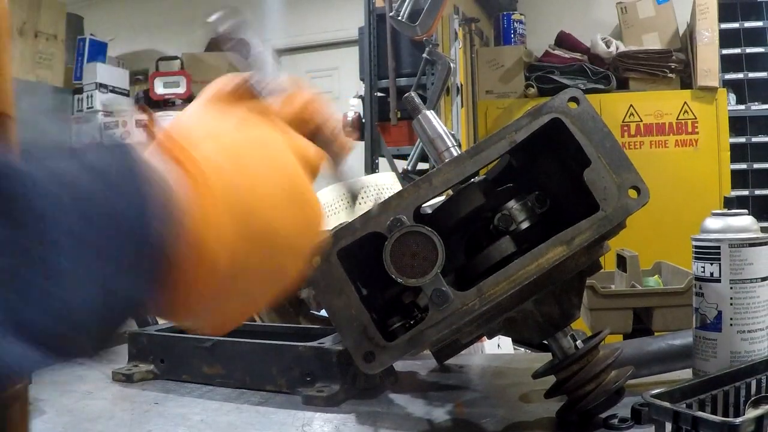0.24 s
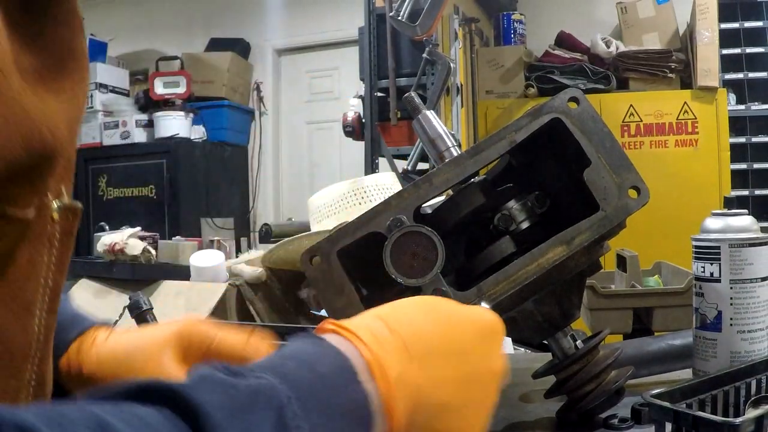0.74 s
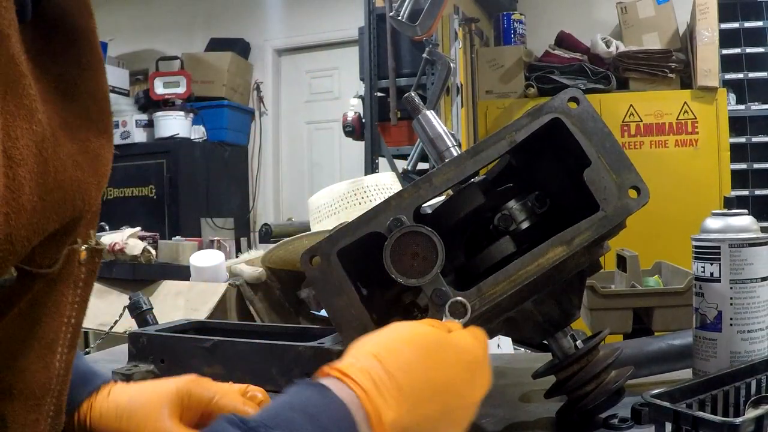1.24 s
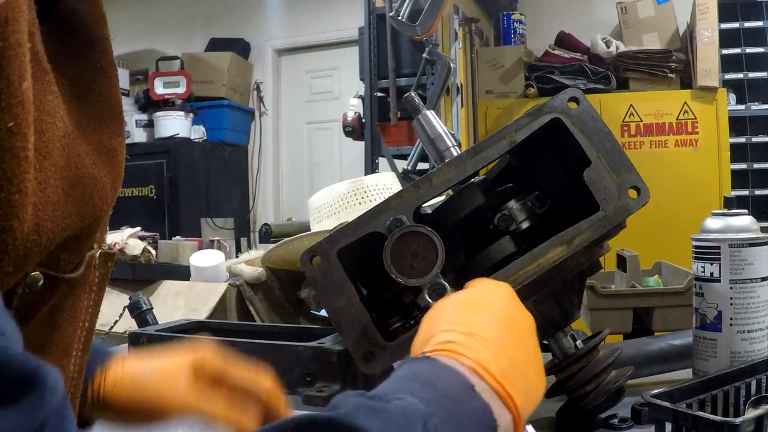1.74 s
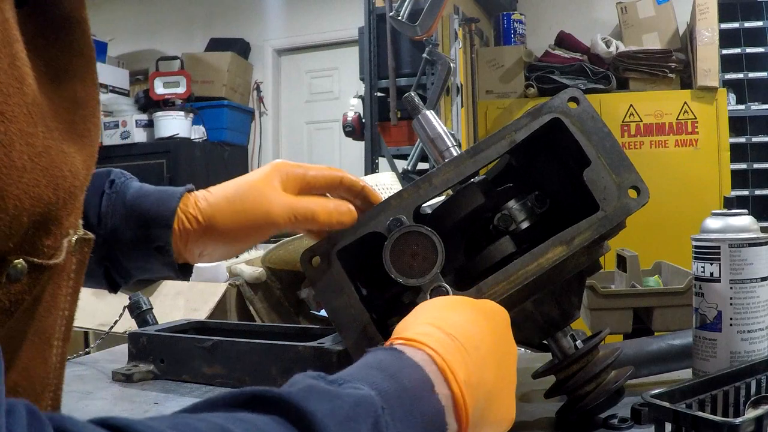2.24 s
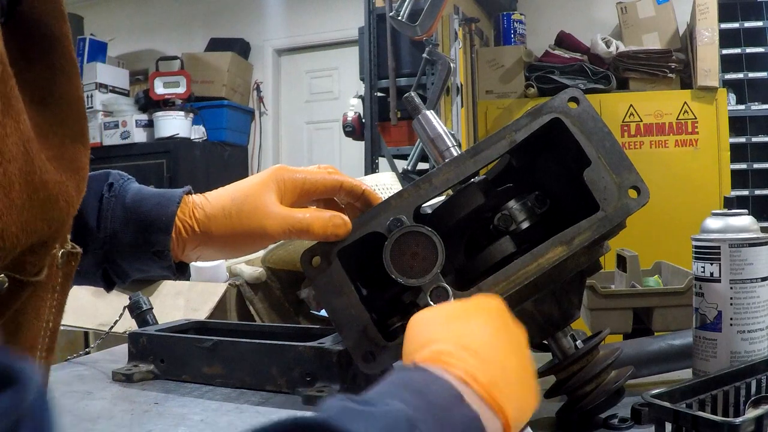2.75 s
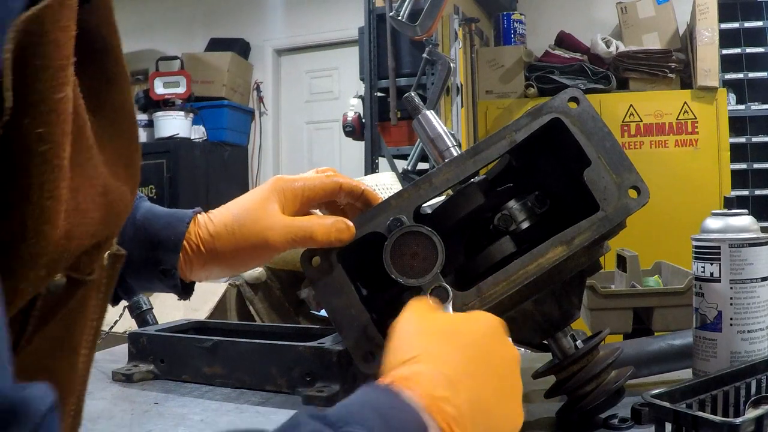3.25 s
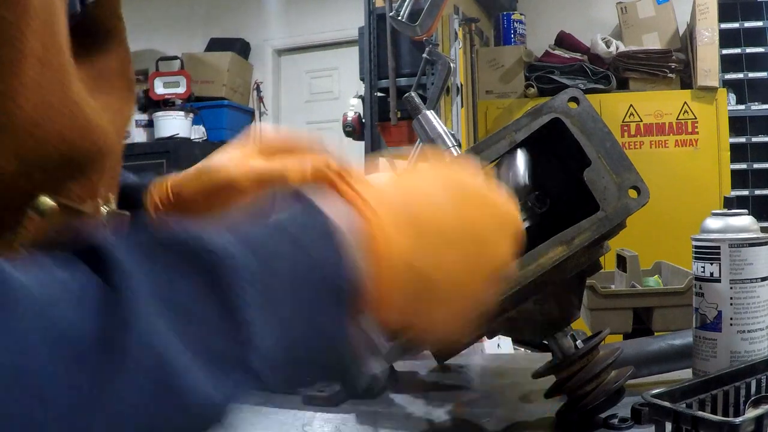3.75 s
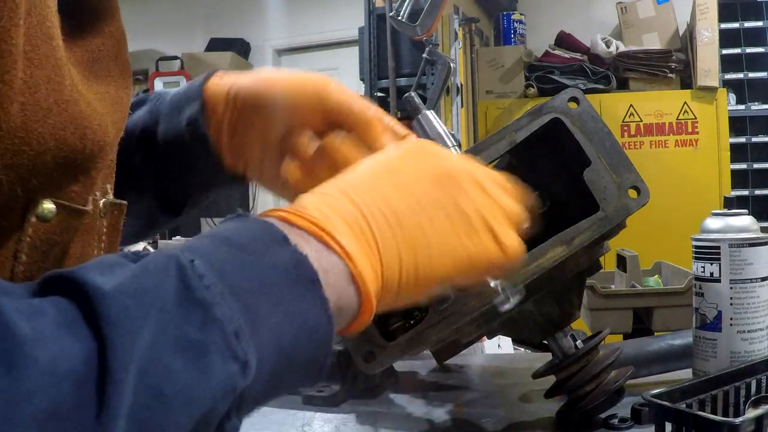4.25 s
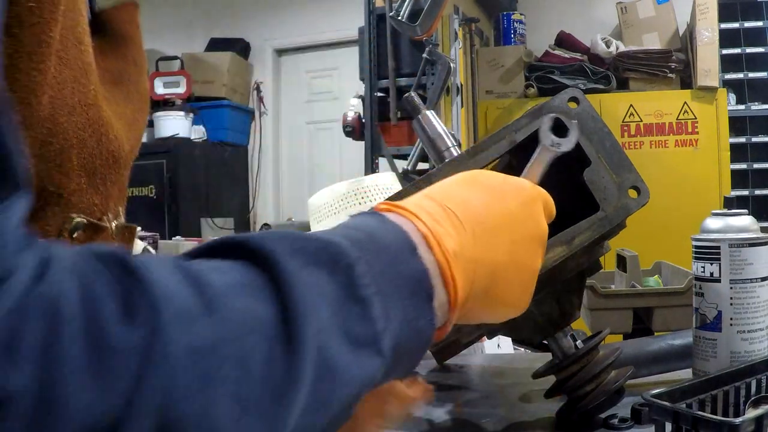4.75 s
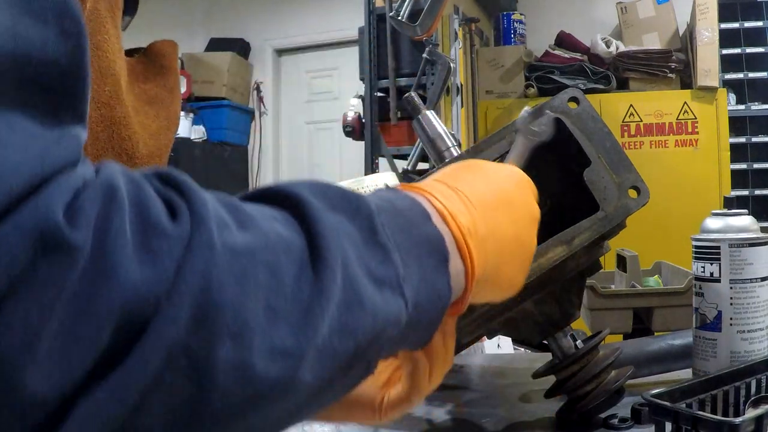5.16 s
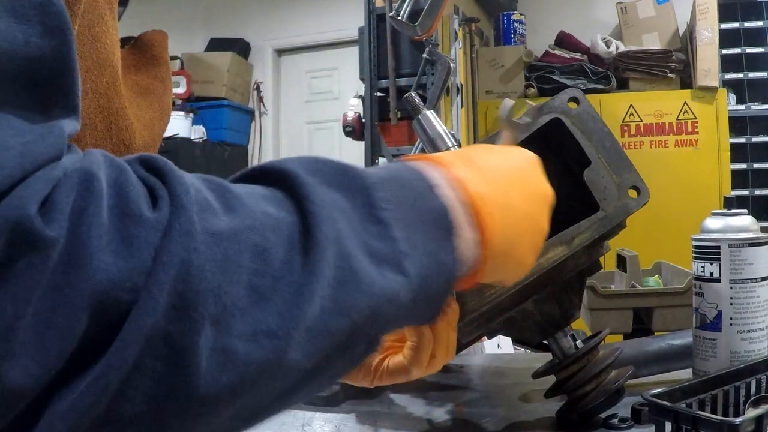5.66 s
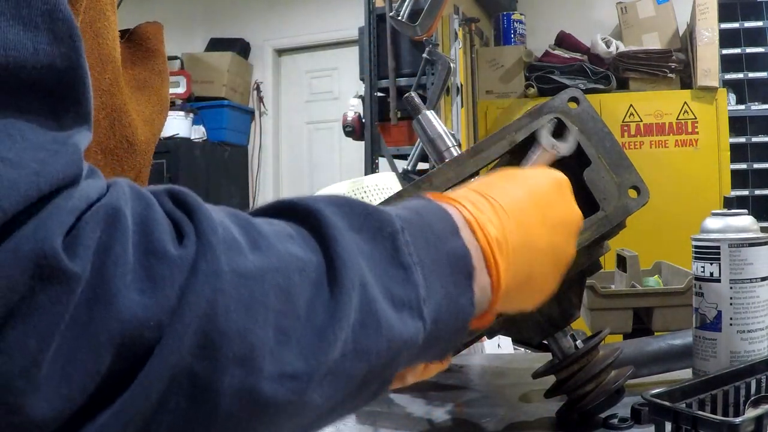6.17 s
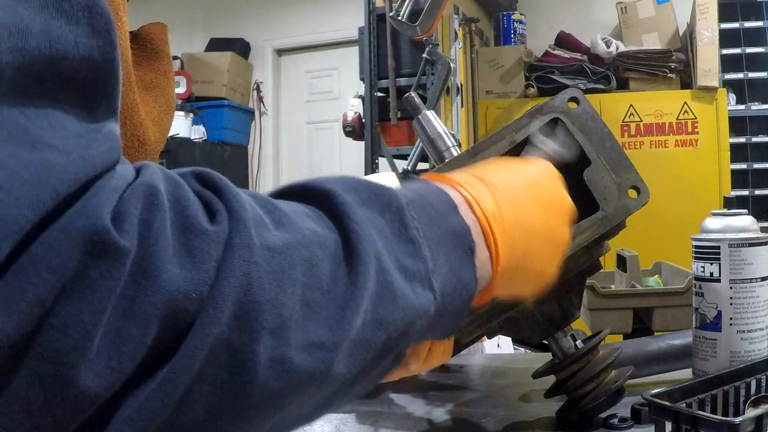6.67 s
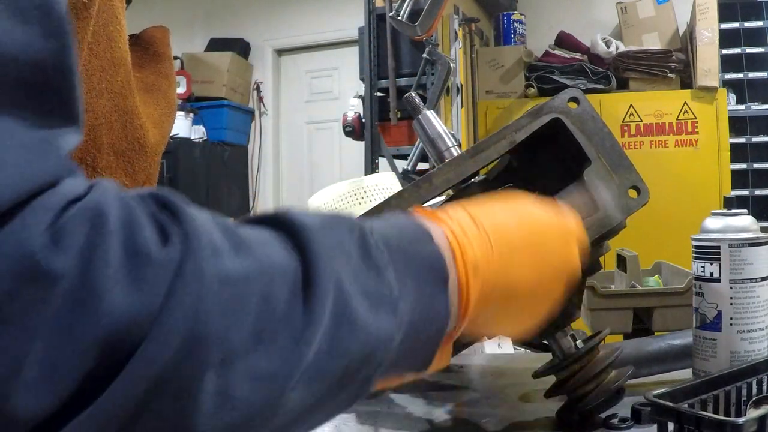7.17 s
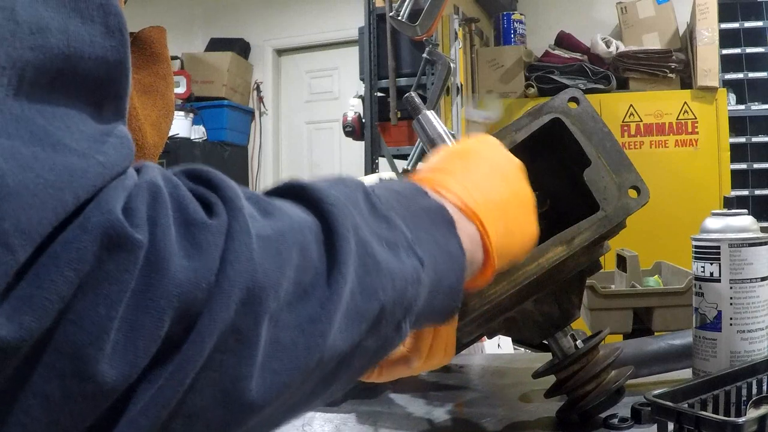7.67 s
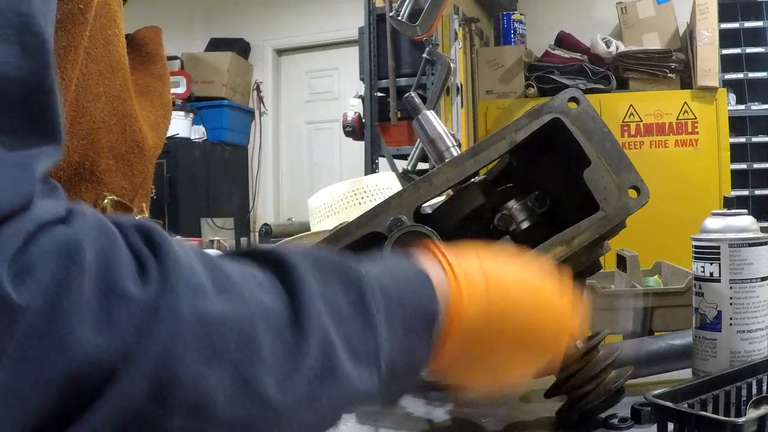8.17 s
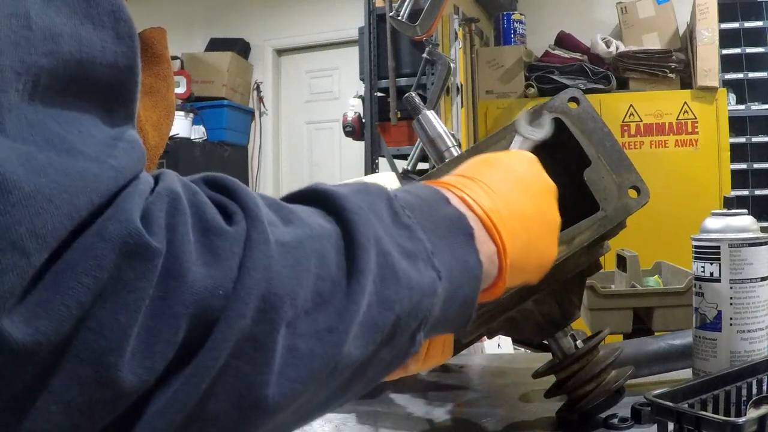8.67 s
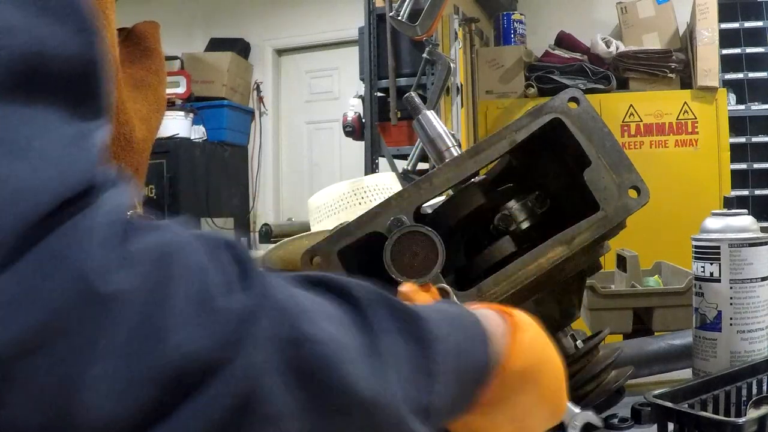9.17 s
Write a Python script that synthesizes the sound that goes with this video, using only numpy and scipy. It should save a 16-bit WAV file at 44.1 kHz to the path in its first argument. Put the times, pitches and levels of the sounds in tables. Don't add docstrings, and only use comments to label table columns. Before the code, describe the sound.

Faint ticks and stiff sleeve rubbing lead into hard metallic blows on a hollow iron casing, each ringing for about half a second over a faint bench drone. The biggest clank comes last. Then the work becomes gentler: hand-damped knocks, wrench jaw clinks, brief chatter and dragging, in uneven clusters to the end. The workshop sounds hard and moderately live, with low air rumble, heard close through a small microphone.

```python
import sys
import numpy as np
from scipy import signal
from scipy.fft import rfft, irfft
from scipy.io import wavfile
from scipy.ndimage import uniform_filter1d

SR = 44100
rng = np.random.default_rng(int(sys.argv[2]) if len(sys.argv) > 2 else 0)


def volts(x):
    e = np.asarray(x, float) / 20
    return 10 ** e


def generate_wav(signal):
    frames = np.transpose(np.atleast_2d(signal))
    scaled = np.clip(frames, -1, 1) * 32767
    pcm = np.round(scaled).astype(np.int16)
    wavfile.write(sys.argv[1], SR, pcm)


N = 415422

# frequency in Hz, level in dB per Hz.
THUD = [(110, -59.5), (180, -14), (518, -8), (710, -7.5), (932, -6.5), (1010, -4), (1100, -2), (1290, -5.5),
        (1570, -7), (1710, -15), (2200, -20), (2860, -48), (4840, -120)]
# frequency in Hz, level in dB per Hz.
THUD_HELD = [(110, -47), (180, -6), (254, -3.5), (429, -7.5), (633, -8.5), (772, -2), (972, -8),
             (1190, -2.5), (1430, -12.5), (1770, -20), (2200, -44), (2860, -78), (4840, -120)]
# frequency in Hz, level in dB, t60 in seconds.
CASING_HELD = [(265.6, -4, 0.3), (436, -1.5, 0.64), (517.3, -5.5, 0.57), (545, 2, 0.14), (703, 0.5, 0.34),
               (782, 4, 0.14), (949, 0.5, 0.34), (1064, -9, 0.594), (1140, 6.5, 0.18), (1348, -4, 0.12),
               (1500, -11, 0.39), (2230, -19.5, 0.12), (2560, -28.5, 0.12)]
# frequency in Hz, level in dB, t60 in seconds.
WRENCH_MODES = [
    [(2790, -20, .03), (3120, -1, .045), (3250, 0, .045), (3490, -9, .035)],
    [(4950, 0, .05), (5150, -10, .03), (5700, -12, .03), (4540, -14, .03)],
    [(8260, 0, .045), (6420, -6, .035), (6850, -6, .03), (10300, -10, .025), (11900, -20, .03)],
]


def evened(x):
    return x / np.sqrt(np.mean(x ** 2) + 1e-20)


def peaked(x):
    return x / np.sqrt(np.mean(x[:500] ** 2))


def read(points, hz):
    f, value = np.transpose(points)
    return np.interp(np.log(hz + 1), np.log(f + 1), value)


def add(mix, s, sound):
    part = mix[round(s * SR):][:len(sound)]
    part += sound[:len(part)]


def level(moves):
    s, db, swell, fade = np.transpose(moves)[:, :, None]
    t = np.arange(0, N + 200, 200) / SR
    span = np.where(t < s, swell, fade)
    arch = volts(db - 20 * ((t - s) / span) ** 2)
    return np.interp(np.arange(N) / SR, t, np.sqrt((arch ** 2).sum(0)))


def coloured(x, spectrum):
    gain = volts(read(spectrum, np.fft.rfftfreq(len(x), 1 / SR)))
    return evened(irfft(rfft(x) * gain, len(x)))


def noise(spectrum, patchy_db, flicker_db, size=N):
    hz = np.fft.rfftfreq(512, 1 / SR)
    a, b, patches = rng.standard_normal((size // 128 + 5, 257, 3)).T
    flicker = evened(uniform_filter1d(patches, size=120, axis=0))
    patches = uniform_filter1d(patches, size=5, axis=0)
    patches = evened(uniform_filter1d(patches, size=16, axis=1))
    gain_db = read(spectrum, hz)[:, None] + patchy_db * patches + flicker_db * flicker
    z = (a + 1j * b) * volts(gain_db)
    return evened(signal.istft(z, nperseg=512, noverlap=384)[1][:size])


def dying(x, slower=1.):
    # frequency in Hz, t60 in seconds.
    shop_decay = [(150, 0.72), (500, 0.56), (1200, 0.44), (2500, 0.5), (5000, 0.42), (8000, 0.42),
                  (12000, 0.2)]
    hz, t, z = signal.stft(x, SR, nperseg=256)
    t60 = slower * read(shop_decay, hz)[:, None]
    return signal.istft(z * volts(-60 * t / t60), SR, nperseg=256)[1][:len(x)]


def in_shop(dry, t, wet_db):
    shop = dying(rng.standard_normal(len(t))) * (1 - np.exp(-t / 0.0011))
    wet = volts(wet_db) * signal.fftconvolve(dry, shop / np.linalg.norm(shop))[:len(t)]
    fade_out = np.cos(np.pi / 2 * t / t[-1]) ** .5
    return (dry + wet) * fade_out


def ring(modes, t, centre_hz=1000, favour_db=0., damp=1., longest=.5, held=0., beat=.7, scatter_db=.3):
    hz, db, t60 = np.transpose(modes)[:, :, None]
    scatter, detune, phase, split = rng.standard_normal((4, len(modes), 1))
    db = db + favour_db * np.exp(-(np.log(hz / centre_hz) / 0.14) ** 2) + scatter_db * scatter
    db = db - 60 * np.maximum(t - held, 0) / np.minimum(t60 * damp, longest)
    pair = 1 + beat * np.cos(2 * np.pi * 0.0092 * hz * split * t)
    sines = np.sin(2 * np.pi * (hz * t * (1 + 0.0023 * detune) + phase))
    return peaked((volts(db) * pair * sines).sum(0))


def strike(row, contact_ms, casing, thud, length, damp, clear_db, crack_share, wet_db):
    # frequency in Hz, level in dB per Hz.
    plate_crack = [(1000, -35), (1700, -4.5), (1900, -16), (2050, -9.5), (2240, -4.5), (2650, -3.5),
                   (3250, 0), (3940, -6.5), (4250, -8.5), (5920, -5.5), (9670, -25.5), (14400, -38),
                   (15500, -45.5)]
    s, casing_db, crack_db, centre_hz, slower = row
    t = np.arange(round(SR * length)) / SR
    walls, plates, lumps = rng.standard_normal((3, len(t)))

    lumps = evened(uniform_filter1d(lumps[:len(t) // 2 + 1], size=round(90 * length) + 1))
    plates = irfft(rfft(plates) * volts(2.0 * lumps), len(t))
    crack = peaked(dying(coloured(plates, plate_crack), crack_share * slower))

    clear = ring(casing, t, centre_hz, favour_db=10.0, damp=damp * slower, longest=1.5, beat=0.67)
    near_spot = [(hz, db - 4.44 * abs(np.log2(hz / centre_hz))) for hz, db in thud]
    body = volts(clear_db) * clear + peaked(dying(coloured(walls, near_spot), slower))

    bloom = 1 - 0.5 * np.exp(-t / 0.03)
    crack_onset = 1 - 0.11 * np.exp(-t / 0.00067)
    dry = volts(casing_db) * body * bloom + volts(crack_db) * crack * crack_onset
    lag = round(contact_ms * SR / 1000)
    swell = dry[lag:0:-1] * np.linspace(0, 1, lag) ** 2
    return s + .002 - lag / SR, in_shop(np.append(swell, dry)[:len(t)], t, wet_db)


SHARP_MS, BUMP_MS = 0.46, 29


def blows():
    # start in seconds, casing level in dB, crack level in dB,
    # favoured casing region in Hz, ring length factor.
    wall_blows = [
        (2.105, -39, -51, 1040, 0.64),
        (3.784, -16, -24, 1130, 0.87),
        (7.373, -40, -45, 433, 0.45),
    ]
    rim_blows = [
        (2.38, -22.5, -28, 1124, 0.63),
        (2.696, -41, -50.5, 520, 0.79),
    ]
    flank_blows = [
        (1.482, -24, -25.5, 1000, 1.1),
        (1.768, -38.5, -49, 1010, 0.74),
    ]
    foot_blows = [
        (3.022, -22.5, -29.5, 1020, 0.76),
        (3.207, -28, -31.5, 685, 0.74),
    ]
    rebound = (2.5, -33.5, -49.5, 985, 0.79)
    # frequency in Hz, level in dB, t60 in seconds.
    wall_modes = [(285.5, 2, 0.25), (447, -6, 0.63), (520, -3.5, 0.45), (619.6, -3, 0.8), (697, 5, 0.3),
                  (759, -5, 0.36), (856, -2, 0.34), (934, 0.5, 0.78), (1081, 1, 0.48), (1132, -0.5, 0.44),
                  (1375, 3.5, 0.52), (1538, 3, 0.56), (1800, -30.5, 0.43), (1880, -11.5, 0.55),
                  (2294, -2.5, 0.45), (2497, -24, 0.73), (2744, -16, 0.62), (2900, -28, .6),
                  (3190, -21.5, 0.36), (3440, -10, 0.21), (3634, -4, 0.071)]
    rim_modes = [(260, -1.5, 0.15), (447, -14, 0.94), (527, -10, 0.5), (770, -4, 0.28), (980, -8, 0.55),
                 (1080, -8.5, 0.55), (1202, -9.5, 0.58), (1350, -8, 0.2), (1490, -6.5, 0.28),
                 (2137, -17, .2), (2425, -7, 0.13), (2804, -21, .25), (3300, -14.5, .25), (3620, -22, .2)]
    lip_modes = [(447, -6, 1), (536, -7, 0.41), (619, -11, .5), (955, 1, 0.38), (1082, -2, 0.41),
                 (1210, -5, .33), (1600, -7, .39), (1653, -6.5, .35), (2137, -20, .4), (2400, -7, 0.28),
                 (2466, -12, .36), (3095, -3, 0.19), (3420, -9, .2), (4097, -22, .3)]
    flank_modes = [(284.7, -9, 0.43), (447, -6, 0.66), (533, -8, 0.74), (626, -7.5, 0.58), (718, -7, 0.42),
                   (1012, -11, 0.53), (1170, -3.5, 0.36), (1386, -4.5, 0.46), (1540, -24, 0.18),
                   (2333, 2.5, 0.14), (2450, -8.5, .25), (2590, -19, .22), (3225, -5, 0.09),
                   (3660, -1, 0.1)]
    foot_modes = [(282, -3.5, 0.22), (447, -6.5, 0.71), (515, -6, 0.45), (770, -9.5, 0.34),
                  (921, -7.5, 0.61), (1080, -6, 0.3), (1234, -3, 0.3), (1530, -5, 0.23), (1670, -7, 0.3),
                  (2310, -6.5, 0.25), (2520, -21, 0.35), (2710, -24, 0.22), (2830, -9, 0.28),
                  (3300, -11.5, 0.29)]
    reseat_modes = [(290, -17, .25), (447, -16, 0.36), (513, -10, 0.53), (650, -16, .25), (775, -15, 0.32),
                    (860, -11, 0.43), (919, -5, .19), (980, -7, 0.23), (1100, -9, .25), (1130, -12, 0.33),
                    (1310, -22, .35), (1554, -17, .26), (2410, -16, 0.14), (3270, -24, .15)]
    out = np.zeros(N)
    for row, casing in zip(rim_blows, (rim_modes, lip_modes)):
        add(out, *strike(row, SHARP_MS, casing, THUD, 0.54, damp=1.0, clear_db=4.5,
                         crack_share=0.87, wet_db=-8.5))
    add(out, *strike(rebound, BUMP_MS, reseat_modes, THUD, 0.26, damp=1.44, clear_db=8.5,
                     crack_share=0.6, wet_db=-9.0))
    for row in flank_blows:
        add(out, *strike(row, 3.2, flank_modes, THUD, 0.6, damp=0.92, clear_db=5.0,
                         crack_share=0.56, wet_db=-8.5))
    for row in foot_blows:
        add(out, *strike(row, SHARP_MS, foot_modes, THUD, 0.6, damp=0.91, clear_db=3.0,
                         crack_share=0.69, wet_db=-9.5))
    for row in wall_blows:
        add(out, *strike(row, SHARP_MS, wall_modes, THUD, 0.59, damp=0.71, clear_db=6.0,
                         crack_share=0.87, wet_db=-13.5))
    return out


def taps():
    # start in seconds, casing level in dB, crack level in dB, favoured region in Hz,
    # ring length factor.
    tap_rows = [(1.408, -33, -37.5, 1130, 0.41), (2.011, -49, -44, 447, 0.69),
                (2.055, -39.5, -41, 1150, 0.32), (2.415, -32, -56, 1230, 0.15),
                (3.748, -33.5, -55, 1130, 0.2), (5.161, -43.5, -54, 780, 0.39),
                (5.287, -45, -60, 1160, 0.19), (5.438, -44.5, -63, 805, 0.22),
                (6.164, -53.5, -73, 439, 0.11), (6.472, -52.5, -61, 440, 0.42),
                (6.656, -50.5, -64, 921, 0.8), (6.769, -40.5, -48.5, 760, 0.24),
                (7.478, -40, -41, 1330, 0.35), (7.496, -39, -55, 750, 0.076),
                (7.819, -35.5, -44.5, 770, 0.4), (8.163, -51.5, -61.5, 754, 0.7),
                (8.299, -40.5, -51.5, 830, 0.39)]
    out = np.zeros(N)
    for row in tap_rows:
        add(out, *strike(row, SHARP_MS, CASING_HELD, THUD_HELD, 0.28, damp=2.16, clear_db=1.5,
                         crack_share=0.39, wet_db=-9.0))
    return out


def bumps():
    # start in seconds, casing level in dB, crack level in dB, favoured region in Hz.
    free_bumps = [(.353, -41.5, -59, 1027), (2.287, -45, -56.5, 1130), (3.47, -49, -59.5, 500),
                  (3.599, -51.5, -57.5, 980), (3.723, -40.5, -54, 1050), (5.252, -48, -50.5, 784),
                  (5.568, -53, -59.5, 770), (7.855, -42, -69, 520), (7.937, -42, -57, 782),
                  (8.536, -48.5, -59.5, 1250), (8.84, -49.5, -61.5, 890), (8.862, -54.5, -72, 1150),
                  (8.957, -48, -65.5, 940)]
    pressed_bumps = [(.858, -52.5, -58, 365), (2.097, -31, -58, 605), (2.257, -40.5, -60, 445),
                     (6.031, -45.5, -59, 790), (6.346, -50, -70, 760), (6.422, -44, -64, 1230),
                     (6.531, -53, -66, 703), (6.736, -40, -60, 845), (6.784, -42, -68, 795),
                     (6.93, -52, -85, 770), (7.121, -53.5, -83, 770), (7.233, -33.5, -56.5, 785),
                     (7.402, -36.5, -58, 650), (8.108, -66, -65, 759), (8.243, -45, -64, 810),
                     (8.521, -62, -61, 1170), (9.093, -31, -48.5, 775), (9.34, -51.5, -63, 413),
                     (9.409, -56, -61, 970)]
    out = np.zeros(N)
    for rows, ring_factor, contact_ms in (free_bumps, 0.49, BUMP_MS), (pressed_bumps, 0.18, 44):
        for row in rows:
            add(out, *strike((*row, ring_factor), contact_ms, CASING_HELD, THUD_HELD, 0.46, damp=1.97,
                             clear_db=-0.5, crack_share=0.88, wet_db=-7.5))
    return out


def ticks():
    # start in seconds, casing level in dB, crack level in dB, favoured region in Hz.
    tick_rows = [(.212, -46, -61, 420), (0.228, -51, -59, 423), (.579, -65, -62, 654),
                 (0.639, -61, -58, 775), (0.768, -47.5, -65, 552), (4.042, -53, -52.5, 1080),
                 (4.571, -50, -61.5, 470), (4.629, -64, -59.5, 1026), (4.75, -71, -62.5, 1130),
                 (7.353, -35, -44.5, 1290), (7.356, -34, -57, 560), (7.368, -28.5, -43, 510)]
    ring_factor = 0.043
    out = np.zeros(N)
    for row in tick_rows:
        add(out, *strike((*row, ring_factor), SHARP_MS, CASING_HELD, THUD_HELD, 0.53, damp=0.3,
                         clear_db=-19.0, crack_share=0.8, wet_db=-5.5))
    return out


def clink(row, groups):
    grip_factors = [0.99, 0.92, 0.58]
    s, *group_db = row
    t = np.arange(SR // 6) / SR
    steel = sum(volts(db) * ring(modes, t, held=0.0039, damp=grip, beat=0.44, scatter_db=2.5)
                for db, modes, grip in zip(group_db, groups, grip_factors))
    rough = 1 + 0.42 * evened(uniform_filter1d(rng.standard_normal(len(t)), size=90))
    onset = 1 - np.exp(-t / .001)
    return s, in_shop(volts(-3.) * steel * onset * rough, t, wet_db=-18.)


def clinks():
    # start in seconds, level in dB of the low, middle and high mode groups.
    gripped_clinks = [(5.1612, -41.5, -41.5, -50.5), (5.252, -60, -54, -65), (5.268, -60, -46, -51),
                      (5.2765, -44, -44, -51), (5.286, -60, -48, -62), (5.4285, -43, -45.5, -52),
                      (5.436, -57, -49.5, -59), (6.0317, -64, -54, -57), (6.412, -60, -66.5, -79),
                      (6.423, -61, -68, -79), (6.433, -64, -68, -79), (6.455, -60, -68, -79),
                      (6.471, -51, -63, -79), (6.484, -62, -68, -79), (6.497, -49, -66, -79),
                      (6.512, -62, -72, -79), (6.524, -53, -68, -79), (6.538, -62, -71, -79),
                      (6.548, -60, -71, -79), (6.692, -66, -72, -83), (6.703, -64, -70, -79),
                      (6.652, -51, -65, -84), (6.7295, -51, -65, -71), (6.768, -43, -48, -56),
                      (6.783, -51, -55, -75), (7.227, -43.5, -44, -50.5), (7.4769, -36.5, -54, -39.5),
                      (7.4952, -38, -49, -45), (7.8204, -43, -54.5, -51), (7.9349, -48, -58, -64),
                      (8.303, -54, -68, -70), (8.5386, -46.5, -62, -78), (9.086, -40.5, -40.5, -47)]
    open_clinks = [(0.213, -62, -72, -77), (1.4071, -29.5, -36, -45), (1.752, -49, -70, -75),
                   (1.766, -43, -60, -70), (2.0107, -43, -48, -58), (2.0537, -47, -48, -47),
                   (2.0992, -33, -36, -39), (2.29, -60, -52, -54), (3.7286, -52, -54, -67),
                   (3.7436, -43, -50, -65)]
    # frequency in Hz, level in dB, t60 in seconds.
    open_modes = [
        [(2586, -5.5, .05), (2720, -2.5, .045), (3117, -0.5, .05), (3220, 0, .045), (3570, 2, .06)],
        [(4230, -3, .04), (5000, -2, .06), (5500, -1, .04), (6190, -10, 0.041), (6480, 0, .035)],
        [(8200, 0, .045), (10330, -10.5, .03), (11900, -23.5, .03)],
    ]
    out = np.zeros(N)
    for rows, groups in (open_clinks, open_modes), (gripped_clinks, WRENCH_MODES):
        for row in rows:
            add(out, *clink(row, groups))
    return out


def wrench():
    contacts = blows() + taps() + bumps() + ticks() + clinks()
    return signal.sosfilt(signal.butter(2, 132, "high", fs=SR, output="sos"), contacts)


def pings():
    # start in seconds, level in dB, frequency in Hz, rise in ms, t60 in seconds.
    ping_rows = [(0.213, -42, 1500, .3, .008), (0.2137, -38, 3180, .3, .01), (.23, -42, 190, 1.5, .03),
                 (0.397, -46, 953, 6, .08), (2.054, -30, 1140, 6.9, 0.11), (2.058, -41, 726, 5, .07),
                 (2.252, -40, 447, 5.5, 0.46), (2.288, -42, 1150, 6, .1), (7.3575, -28, 600, .8, .025),
                 (3.209, -31, 5500, 2, .08), (5.163, -40.5, 452, 3.3, 0.12), (5.255, -45, 477, 5, .1),
                 (5.275, -49, 690, 10, .5), (5.415, -43, 520, 6.8, 0.19), (5.437, -46, 496, 3, 0.064),
                 (5.565, -41, 780, 4, 0.062), (5.586, -44, 763, 3, 0.067), (5.625, -54, 775, 6, .08),
                 (6.722, -40, 1157, 8, 0.07), (7.354, -32, 1300, .5, .02), (7.369, -27, 1250, 0.46, 0.018),
                 (7.371, -25.5, 425, 0.73, 0.033), (7.396, -29, 298, 3, 0.06), (7.808, -43, 930, 6, .06),
                 (7.82, -33, 3024, 2.6, 0.047), (7.822, -31, 780, 3, .12), (7.845, -42, 3120, 3, .04),
                 (7.848, -40, 400, 4.4, .12), (9.084, -27, 1180, 5.5, 0.13), (9.092, -23, 775, 3.1, 0.076)]
    out, t = np.zeros(N), np.arange(SR // 4) / SR
    for s, db, hz, rise_ms, t60 in ping_rows:
        swell = np.minimum(t * 1000 / rise_ms, 1) * np.cos(np.pi / 2 * t / t[-1])
        add(out, s, swell * volts(db - 60 * t / t60) * np.sin(2 * np.pi * hz * t))
    return out


def rattle():
    # fullest moment in seconds, level in dB, swell in seconds, fade in seconds.
    chatter = [
        (6.5, -65, 0.06, 0.05),
        (6.72, -63, 0.064, 0.072),
    ]
    touches = volts(4.1 * np.minimum(rng.exponential(1, N), 3)) * (rng.random(N) < 250 / SR)
    t = np.arange(SR // 10) / SR
    steel = ring(WRENCH_MODES[0], t, beat=0.23) + volts(-19.0) * ring(WRENCH_MODES[1], t, beat=.3)
    return volts(-2.0) * level(chatter) * evened(signal.oaconvolve(touches, steel)[:N])


def drag():
    # fullest moment in seconds, level in dB, swell in seconds.
    slides = [(.5, -50, 0.38), (1.1, -55, 1), (4.25, -47.5, 0.15), (4.9, -50.5, 0.21), (5.451, -37, 0.086),
              (6.05, -57, 0.19), (6.5, -46, 0.2), (7.15, -47, 0.26), (7.43, -39, 0.12), (7.87, -41.5, 0.11),
              (8.15, -46.5, 0.15), (8.42, -48.5, 0.1), (8.95, -55.5, 0.24), (9.2, -41, 0.12),
              (9.42, -41.5, 0.19)]
    slips = volts(2.7 * np.minimum(rng.exponential(1, N), 4)) * (rng.random(N) < 500 / SR)
    slips = slips * rng.choice([-1, 1], N)
    t = np.arange(SR // 5) / SR
    body = peaked(dying(coloured(rng.standard_normal(len(t)), THUD_HELD), 1.0))
    body = body + volts(-10.0) * ring(WRENCH_MODES[0], t)
    body = body + volts(6.5) * ring(CASING_HELD, t, damp=0.46)
    moves = [(s, db, swell, 0.99 * swell) for s, db, swell in slides]
    return volts(-14.0) * level(moves) * evened(signal.oaconvolve(slips, body)[:N])


def sleeves():
    # fullest moment in seconds, level in dB, swell in seconds, fade in seconds (spans of 20 dB).
    arm_moves = [
        (0., -57.5, .1, 0.39),
        (.72, -56.5, 0.34, 0.28),
        (1.03, -46, 0.17, 0.22),
        (1.3, -54.5, 0.22, 0.1),
        (4.08, -53, 0.26, 0.11),
        (4.47, -59, 0.47, 0.22),
        (4.85, -58, 0.12, 0.21),
        (5.18, -52.5, .25, 0.47),
        (5.45, -48.5, 0.19, 0.2),
        (5.72, -66.5, 0.33, 0.35),
    ]
    # frequency in Hz, level in dB per Hz.
    cloth_colour = [(350, -34), (600, -26.5), (1100, -9.5), (1620, -11.5), (2100, -7), (2330, -4),
                    (2600, -12), (3140, -12.5), (3510, -8), (3880, -14), (4120, -1.5), (4400, -12),
                    (7270, -17), (12000, -46), (15600, -74), (22000, -120)]
    crackle = volts(2.4 * np.minimum(rng.exponential(1, N), 4)) * (rng.random(N) < 1500 / SR)
    crackle = crackle * rng.choice([-1, 1], N)
    hiss = noise(cloth_colour, patchy_db=2.2, flicker_db=2.5)
    rub = hiss + 0.24 * coloured(crackle, cloth_colour)
    return volts(-1.5) * level(arm_moves) * rub


def thumps():
    # start in seconds, level in dB.
    thump_rows = [
        (.22, -56),
        (2.1, -56),
        (7.36, -47),
    ]
    thump_hz, peak_s = 84.8, 0.023
    out, t = np.zeros(N), np.arange(SR // 4) / SR
    push = np.e * t / peak_s * np.exp(-t / peak_s)
    for s, db in thump_rows:
        add(out, s, volts(db) * push * np.sin(2 * np.pi * thump_hz * t))
    return out


def bench():
    # start in seconds, level in dB, t60 in seconds.
    kick_rows = [(1.483, -41.5, 0.73), (1.758, -62.5, 0.79), (2.095, -41.5, 1.36), (2.377, -35.5, 0.41),
                 (3.023, -37.5, 0.49), (3.21, -54.5, 0.72), (3.783, -42, 1.06), (5.5, -56, 1.16),
                 (6.5, -58.5, 2.5), (6.75, -51.5, 1.7), (7.22, -49, 0.99), (7.36, -64, 0.35),
                 (7.829, -57.5, 7.7), (8.9, -66.5, 3.5)]
    bench_hz = 169
    t = np.arange(N) / SR
    kicks = sum(volts(db - 60 * abs(t - s) / t60) * np.clip((t - s) / 0.033, 0, 1) for s, db, t60 in kick_rows)
    waver = evened(uniform_filter1d(rng.standard_normal(N), size=3000))
    return kicks * np.sin(2 * np.pi * np.cumsum(bench_hz + 1.0 * waver) / SR)


def hum():
    # frequency in Hz, level in dB per Hz.
    hum_colour = [(12, -44.5), (20, 0.5), (53, 0.5), (93, -10), (129, -7), (166, -10.5), (363, -21.5),
                  (1460, -26), (1680, -32), (2220, -27.5), (3100, -31.5), (3560, -29.5), (4710, -32),
                  (5260, -28), (15600, -37)]
    air = noise([(20, 0.024), (20000, 0.00048)], patchy_db=-1.46, flicker_db=2.0)
    return volts(-57.5) * coloured(air, hum_colour)


def scene():
    echo_ms, echo_gain = .845, .38
    cloth = sleeves()
    cloth = cloth + echo_gain * np.roll(cloth, round(echo_ms * SR / 1000))
    return (wrench() + pings() + rattle() + drag() + cloth + thumps() + bench() + hum())[None]


def low_pass(x):
    return signal.sosfilt(signal.butter(12, 16380, fs=SR, output="sos"), x)


def record(dry):
    edged = signal.oaconvolve(dry, signal.firwin(255, 16000, fs=SR)[None], "same")
    return low_pass(edged)


dry = scene()
out = record(dry)
generate_wav(out)
```